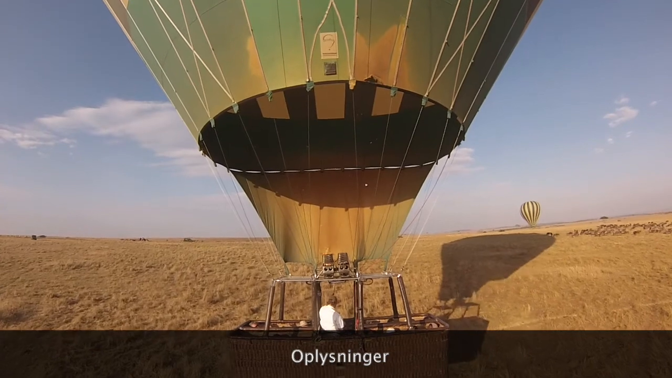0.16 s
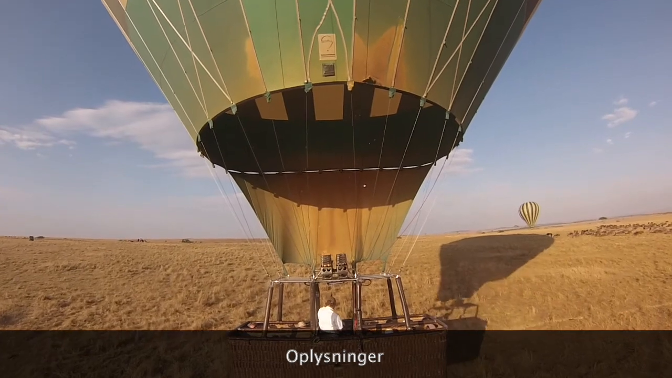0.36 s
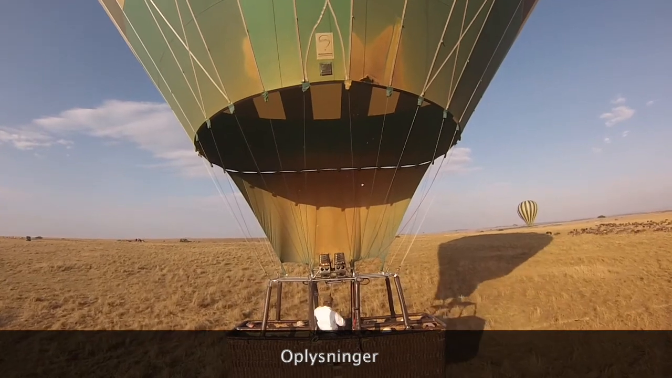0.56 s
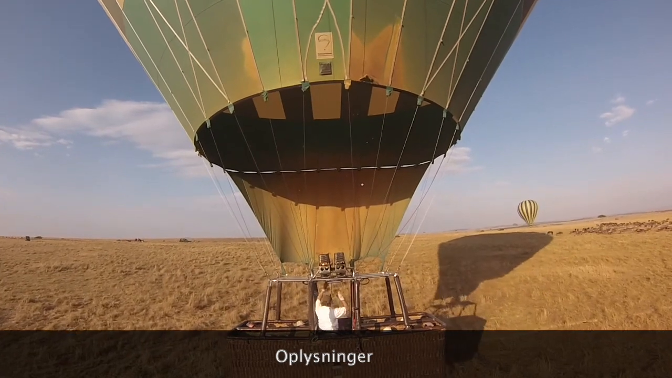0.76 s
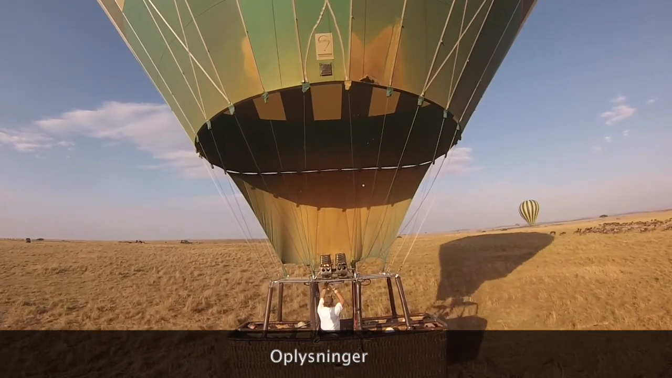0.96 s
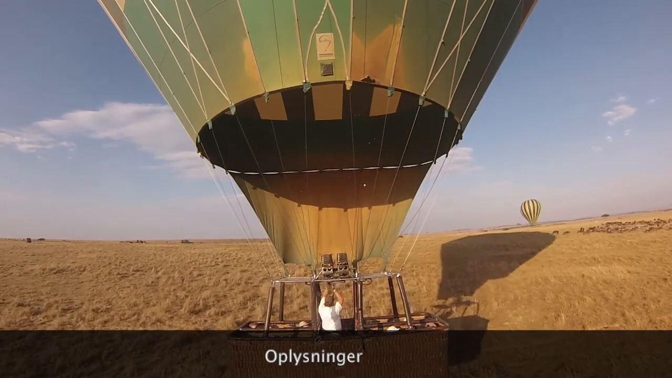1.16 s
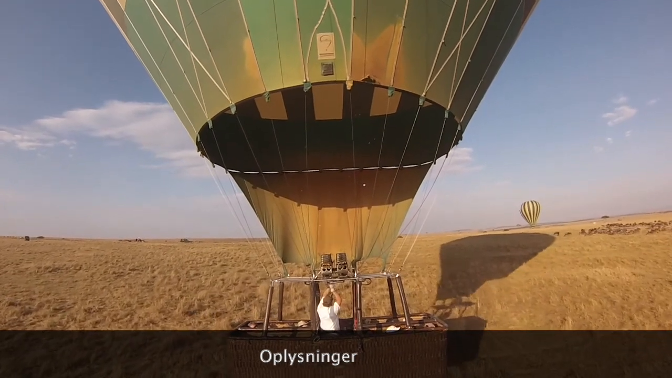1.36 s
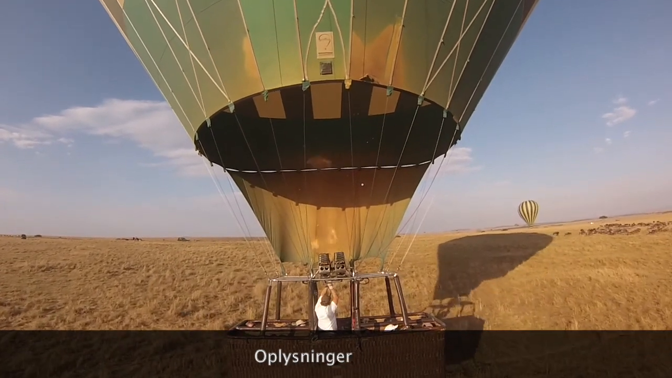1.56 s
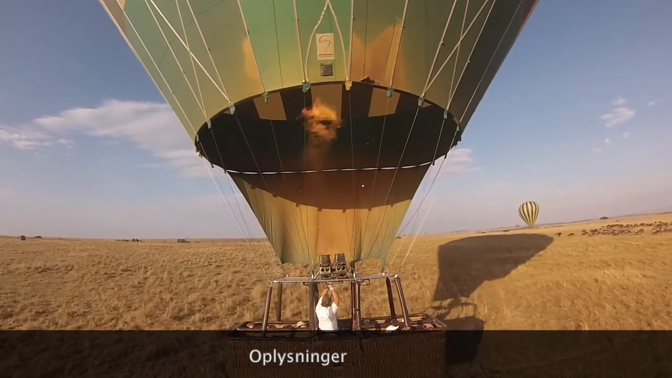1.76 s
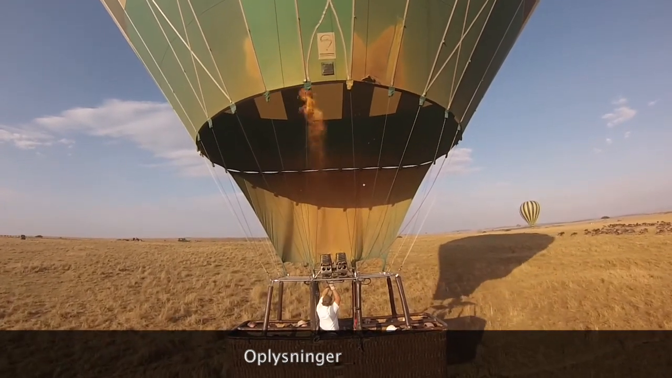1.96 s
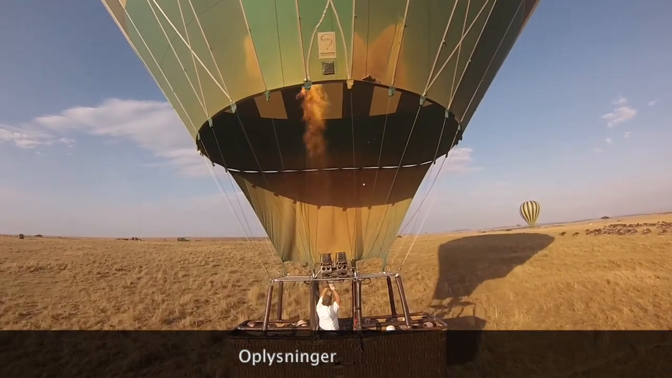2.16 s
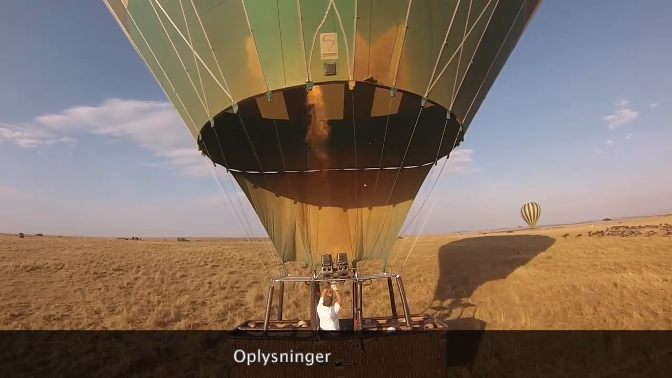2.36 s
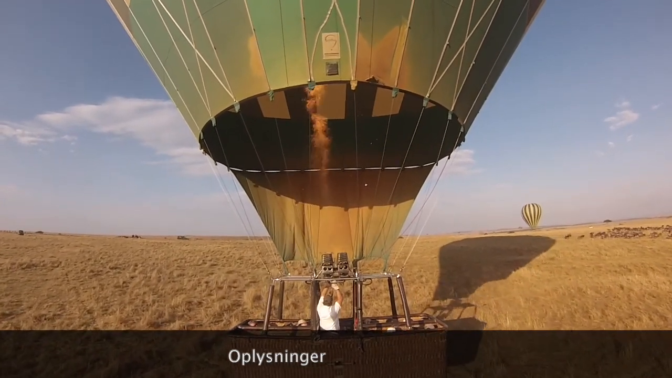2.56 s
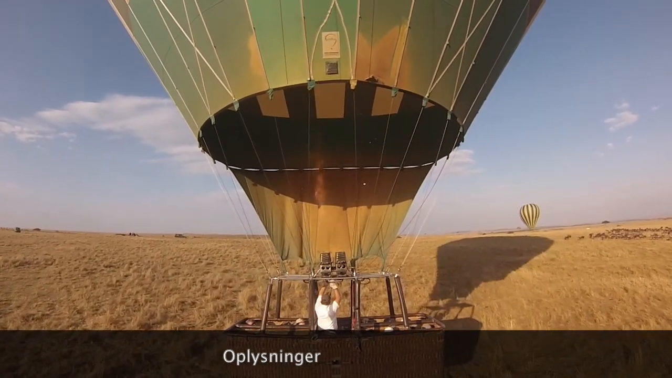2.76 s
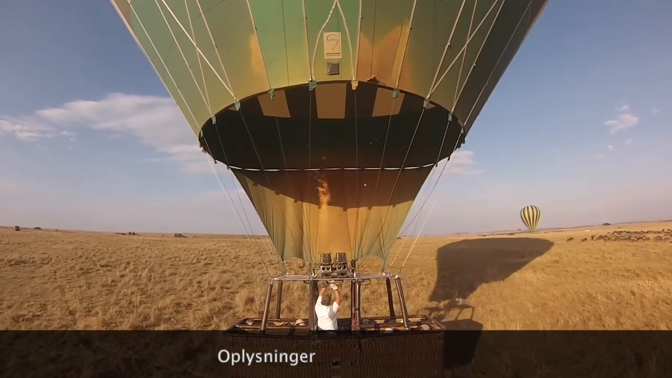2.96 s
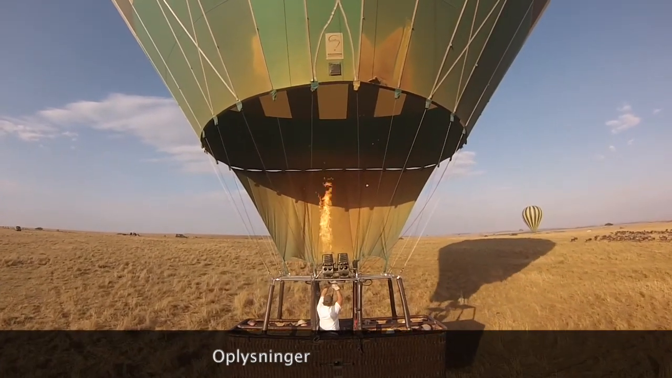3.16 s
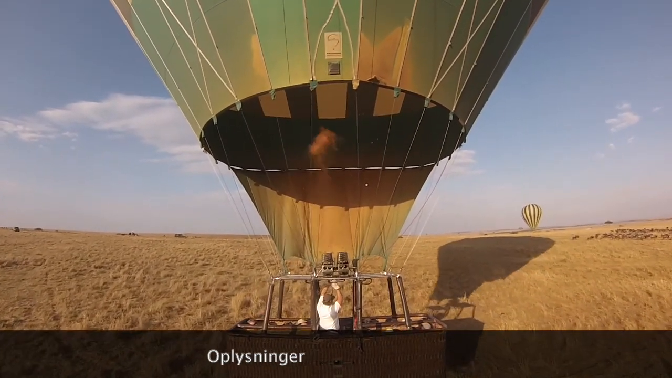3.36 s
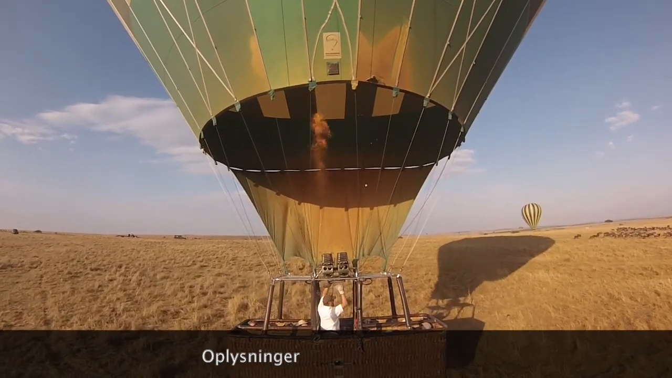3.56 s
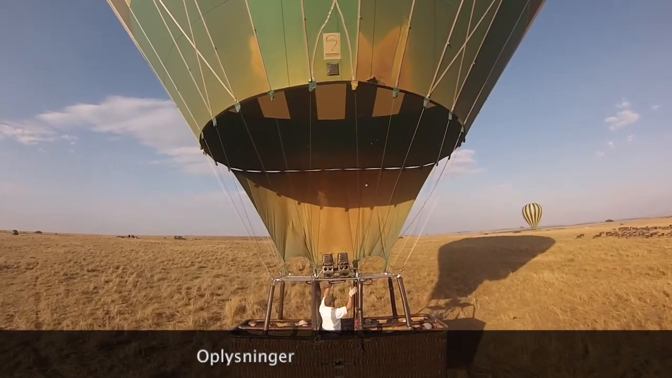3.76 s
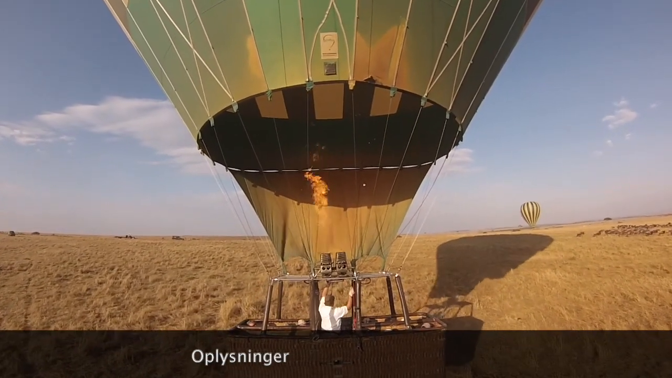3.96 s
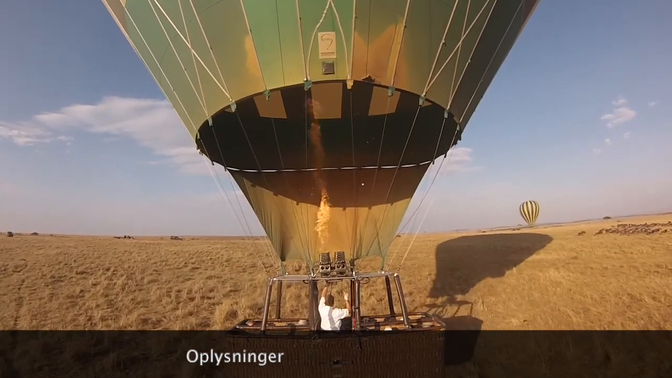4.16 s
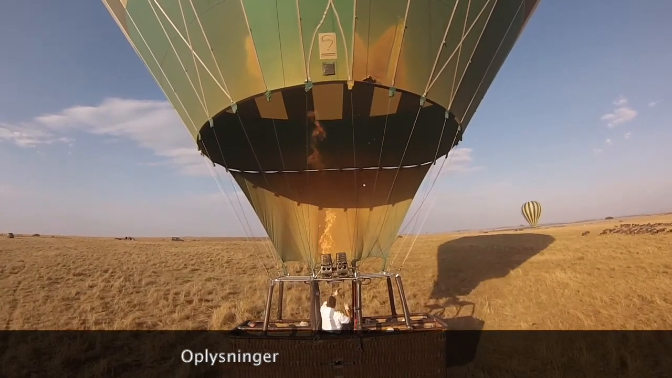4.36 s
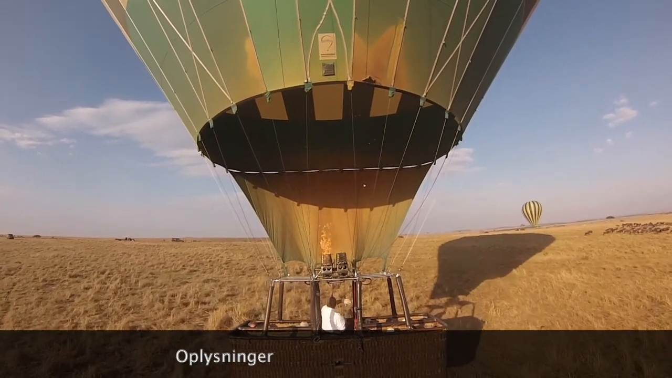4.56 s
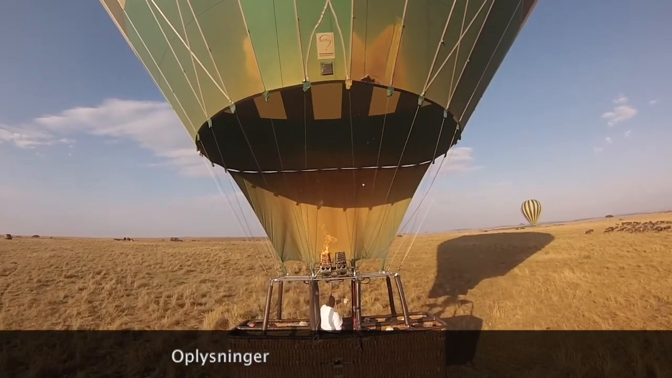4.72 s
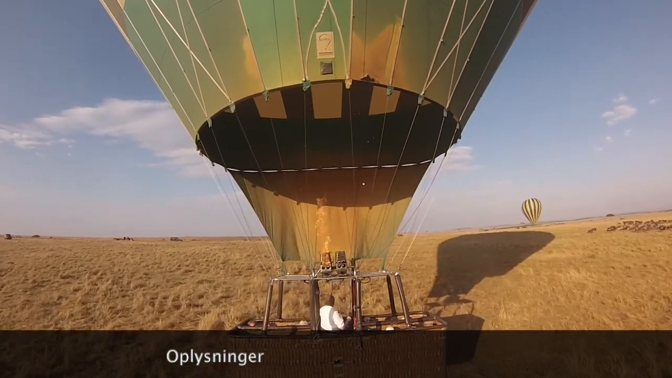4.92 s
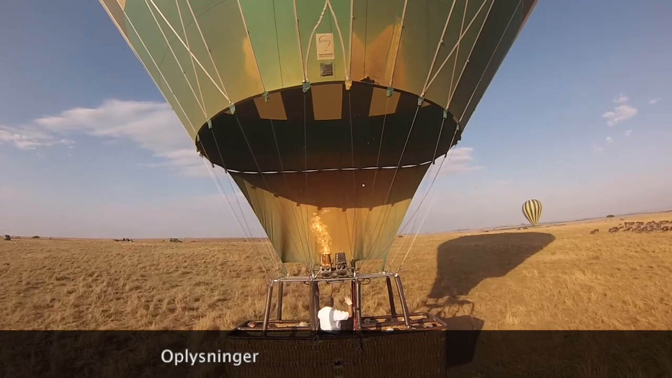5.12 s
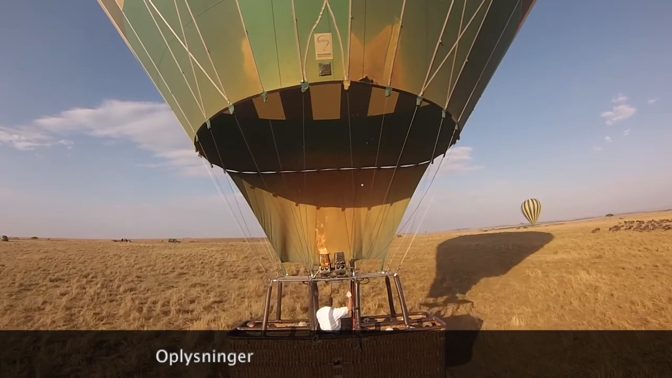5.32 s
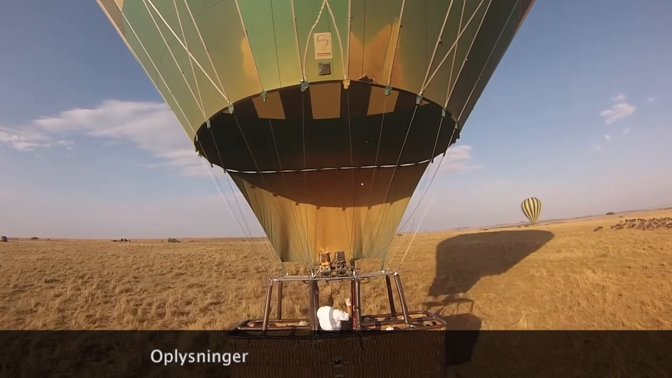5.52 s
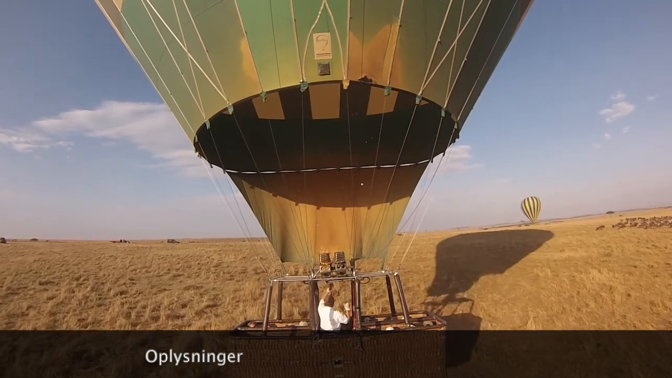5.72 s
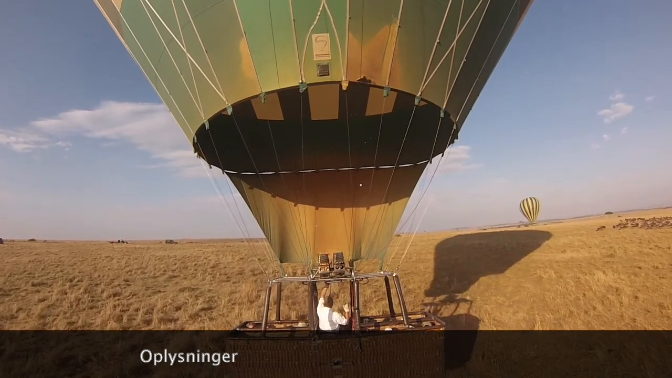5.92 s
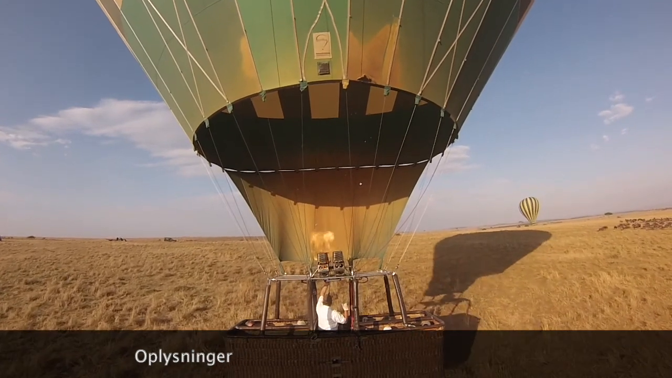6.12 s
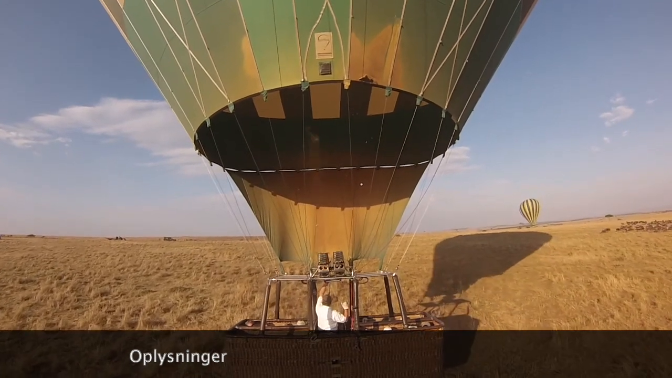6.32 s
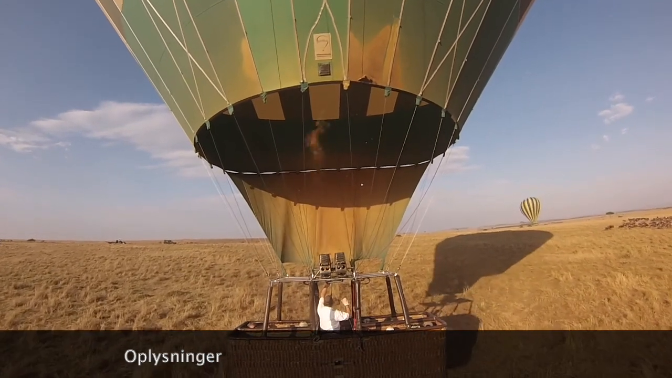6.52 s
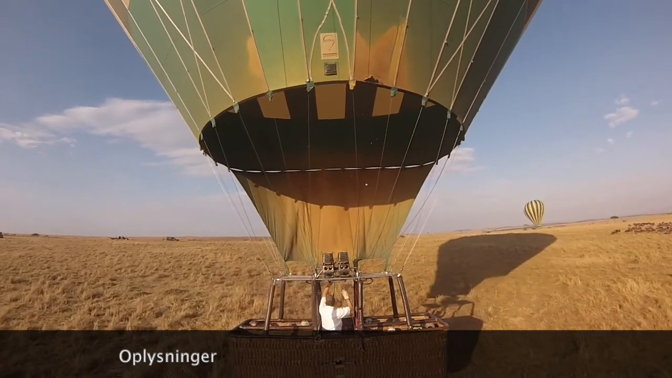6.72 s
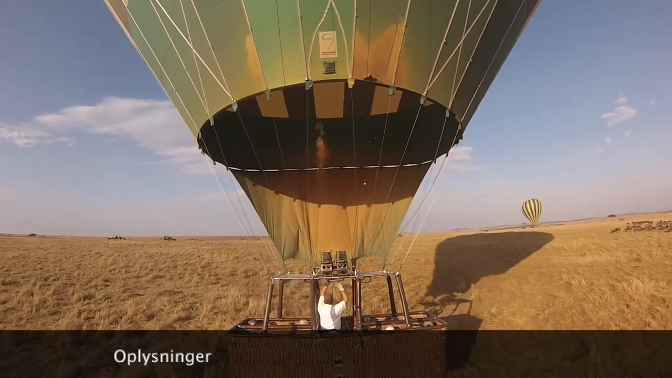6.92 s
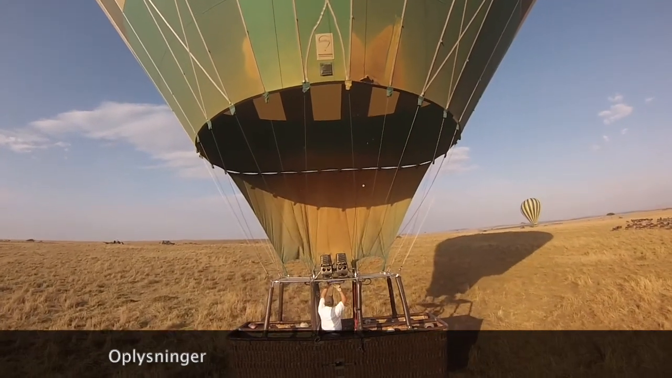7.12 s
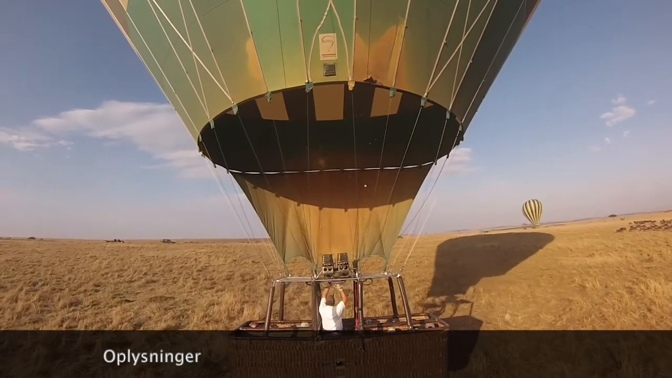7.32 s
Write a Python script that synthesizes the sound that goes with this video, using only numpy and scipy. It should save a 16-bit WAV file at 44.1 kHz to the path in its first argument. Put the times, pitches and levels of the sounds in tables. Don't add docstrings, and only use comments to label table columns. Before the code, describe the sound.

Outdoors, a propane burner bursts into deep, ragged roars topped by gas-jet hiss, separated by short lulls of soft wind and faint hissing.

```python
import sys
import numpy as np
from scipy import signal
from scipy.fft import rfft, irfft, next_fast_len
from scipy.io import wavfile
from scipy.ndimage import uniform_filter1d

SR = 44100
rng = np.random.default_rng(int(sys.argv[2]) if len(sys.argv) > 2 else 0)


def persist_wave(psi):
    counts = np.round(np.clip(psi, -1, 1) * 32767).astype(np.int16)
    wavfile.write(sys.argv[1], SR, np.atleast_2d(counts).T)


def linear_from_db(decibels):
    return 10 ** (np.asarray(decibels, float) / 20)


N = 325369

# pitch_hz, level_db (per Hz)
QUIET_COLOUR = [(41, -34), (92, 0.5), (161, -8.5), (231, -3), (397, -12), (500, -9.5), (700, -15.5),
                (1340, -16.5), (1800, -29.5), (5040, -35), (7500, -35.5), (9500, -35), (12500, -39.5),
                (15400, -46)]
# pitch_hz, level_db (per Hz)
WIND_COLOUR = [(15, -16), (30, -8), (45, 0), (58, -7), (75, -14), (110, -28)]
# time_s, wind_db, air_db
STILL_LEVELS = [
    [(0.0, -51, -48), (0.28, -46, -49), (0.502, -50, -52), (0.702, -50.5, -52), (1.052, -52, -50.5),
     (1.178, -48, -51.5), (1.33, -49, -51)],
    [(5.45, -52, -52), (5.858, -51, -50), (6.04, -51, -52)],
]
# pitch_hz, width_hz, early_db, late_db
PILOT_WHISTLES = [(3470, 240, -67, -76), (4320, 500, -70, -72), (3700, 1600, -71, -69)]
# pitch_hz, level_db (per Hz)
SCUFF_COLOUR = [(800, -12), (1250, 6), (1700, -23), (2600, -7), (3300, -0.5), (4300, -6.5), (4900, -12),
                (6500, -12), (8600, -5), (11000, -22), (15000, -22)]
# start_s, level_db, rise_s, decay_s, strongest_hz
RUSTLE_EVENTS = [
    (0.012, -45.5, .001, .012, 3500),
    (.149, -40.5, 0.0014, 0.017, 4350),
    (.165, -51.5, .01, 0.045, 2900),
    (2.76, -50, .08, 0.34, 2400),
    (3.088, -43, .004, .01, 3000),
]
# open_s, let_go_s, flow_db, sag_db_per_s, dying_db_per_s
VALVE_PULLS = [
    (1.348, 1.704, -2.5, 5, 80),
    (1.49, 2.743, 2.5, 5.5, 94),
    (3.151, 3.747, 1.5, 12.5, 80),
    (3.833, 4.53, -1.55, 7, 80),
    (6.054, 7.06, 1, 6.5, 68),
    (7.112, 7.6, -2, 0.5, 80),
]
OPENING_DB, OPENING_S = 66.5, 0.034
CLOSING_S, DYING_DB = 0.07, 129
# middle_s, length_s, rumble_db, body_db, jets_db
FLAME_SWELLS = [(1.445, 0.038, 0.5, 2.5, 2.5), (1.653, 0.058, 5, 2, 2.5), (1.78, 0.17, -1.5, -0.8, -2.5),
                (1.896, 0.041, 4, -1, 2.5), (2.23, 0.22, -0.5, 1.6, 3), (2.32, 0.021, 0.5, 5, 2.3),
                (2.722, 0.35, 1.5, 2.5, 3.1), (3.08, 0.22, -2.2, 3.5, 0), (3.252, 0.043, -2.5, 3.5, 3.5),
                (3.7, 0.41, 0, 1.1, 1.5), (3.946, 0.031, 4, -2, -0.5), (4.045, .06, 2.8, -3.5, 1),
                (4.206, .2, 1, -2, -0.6), (4.547, 0.066, 4, -1, 0.5), (4.616, 0.14, 3.5, -0.1, -1.5),
                (6.105, .05, -4.5, -1.5, 0.5), (6.18, 0.19, -1, 2.5, 1.5), (6.348, 0.17, -0.7, 6, 0),
                (6.405, 0.05, -2, -2.7, -3.5), (6.57, 0.19, 0.5, 2.5, -3.7), (6.699, 0.082, -0.5, -4, -2),
                (6.768, 0.086, -1.5, 1.3, -3.5), (6.995, 0.068, 2.5, 1.5, -3.5),
                (7.126, 0.18, 3.5, 0, -0.5)]
# time_s, peak, pitch_hz
GAS_POPS = [(1.4615, -.55, 170), (1.784, .65, 130), (1.93, .55, 140), (2.3295, -.75, 100),
            (2.5885, .65, 125), (2.7245, .5, 230), (3.2155, .4, 260), (4.4055, .6, 170), (4.431, .85, 220),
            (6.145, .55, 170), (6.5365, -.65, 200), (6.559, -.95, 240), (6.599, .7, 190)]
# pitch_hz, level_db (per Hz)
RUMBLE_COLOUR = [(12, -38), (20, -14), (75, 1.5), (114, -2.5), (168, -0.5), (217, -5), (248, -3.5),
                 (338, -10.5), (500, -13.5), (650, -19.5), (1100, -120)]
# pitch_hz, level_db (per Hz)
BODY_COLOUR = [(250, -2), (350, 3.5), (500, -3.5), (700, -5.5), (1000, -9.5), (1500, -16), (2200, -26),
               (3000, -56.5)]
# pitch_hz, level_db (per Hz)
JET_COLOUR = [(1500, -55), (1900, -5.5), (3200, 2), (4500, -0.5), (5150, -5.5), (5600, -33)]
# pitch_hz, level_db (per Hz)
SIZZLE_COLOUR = [(4700, -33), (5150, -3.5), (5600, -6), (7000, -9), (9000, -2), (12000, -9), (12800, -17),
                 (14200, -16), (15400, -22)]
# level_db, knee_db, share_above, share_below
RUMBLE_LAW, BODY_LAW = (-15.5, -8.5, 0.07, 0.63), (-22.5, -16.5, 0.21, .85)
JET_LAW, SIZZLE_LAW = (-32.5, -19.5, 0.94, 1.15), (-29.5, -9, 0.97, 1)
STARVED_DB, STARVED_SHARE = -35, 0.65
DEEPENING = 0.38
DULLING = 0.24
# pitch_hz, width_hz, level_db
HOUSING_MODES = [(1380, 500, 6), (1980, 550, -12), (2450, 350, -13), (4250, 900, 8), (6950, 500, 5),
                 (10500, 1200, -3), (11900, 600, 4), (14200, 1500, 4), (6300, 700, -3), (3700, 400, -2),
                 (5150, 800, -13), (7520, 700, -15)]
# start_s, depth_db
GAIN_DIPS = [
    (2.33, 4.5),
    (2.587, 5),
    (4.421, 3),
    (6.56, 2),
    (6.6, 5),
]
DIP_S, RECOVERY_DB_PER_S = 0.014, 29
# middle_s, length_s, depth_db
TREBLE_LOSSES = [
    (1.589, .014, -24),
    (1.984, .045, -30),
    (2.934, .018, -15),
    (6.326, .022, -13),
]
# middle_s, length_s, pitch_hz, level_db
THIN_TONES = [(1.988, .04, 3924, -34), (1.984, .045, 4446, -33), (1.988, .04, 8026, -37),
              (1.988, .04, 8311, -36), (1.98, .04, 8451, -38), (1.978, .035, 8941, -38),
              (2.934, .035, 8634, -52), (1.995, .04, 1582, -34), (1.998, .035, 720, -26),
              (1.978, .04, 831, -32), (1.975, .04, 946, -33), (6.322, .03, 745, -23),
              (6.326, .035, 1040, -24), (6.32, .03, 1450, -28), (6.327, .035, 3929, -35),
              (6.325, .04, 5566, -38)]


def rms_one(x):
    return x / np.sqrt(np.mean(x ** 2) + 1e-20)


def drift(rate_hz):
    step = 20
    r = np.exp(-2 * np.pi * rate_hz * step / SR)
    noise = rng.standard_normal(N // step + 3002)
    slow = signal.lfilter([1], [1, -2 * r, r * r], noise)[3000:]
    return np.interp(np.arange(N) / step, np.arange(len(slow)), rms_one(slow))


def resonance(x, hz, width_hz):
    r = np.exp(-np.pi * width_hz / SR)
    gain = (1 - r * r) / 2
    return signal.lfilter(gain * np.array([1, 0, -1]), [1, -2 * r * np.cos(2 * np.pi * hz / SR), r * r], x)


def housing(x):
    for hz, width_hz, db in HOUSING_MODES + HOUSING_MODES:
        x = x + (linear_from_db(db / 2) - 1) * resonance(x, hz, width_hz)
    return x


def turbulence(colour, shared, shared_db, own_db, own_rate):
    hz_points, db_points = np.transpose(colour)
    size = next_fast_len(N)
    white = rfft(rng.standard_normal(N), size)
    hz = np.linspace(1, SR / 2, len(white))
    shaped = white * linear_from_db(np.interp(np.log(hz), np.log(hz_points), db_points, left=-90, right=-90))
    out, octave = np.zeros(N), np.log2(hz)
    for centre in np.arange(np.log2(hz_points[0]), np.log2(hz_points[-1]) + .5, .5):
        window = np.cos(np.pi * np.clip(octave - centre, -.5, .5)) ** 2
        band = irfft(shaped * window, size)[:N]
        out += band * linear_from_db(shared_db * shared + own_db * drift(own_rate))
    return out


def wind_and_air(t):
    s, wind_db, air_db = np.transpose(np.concatenate(STILL_LEVELS))
    wind = rms_one(turbulence(WIND_COLOUR, 0, 0, own_db=0, own_rate=6))
    wind /= np.sqrt(uniform_filter1d(wind ** 2, size=4000) + .2)
    air = rms_one(turbulence(QUIET_COLOUR, 0, 0, own_db=.5, own_rate=12))
    return linear_from_db(np.interp(t, s, wind_db)) * wind + linear_from_db(np.interp(t, s, air_db)) * air


def pilot_light(t):
    out = np.zeros(N)
    for hz, width_hz, early_db, late_db in PILOT_WHISTLES:
        breath = rng.standard_normal(N) * linear_from_db(drift(12))
        whistle = resonance(resonance(breath, hz, width_hz), hz, width_hz)
        out += linear_from_db(np.interp(t, [0, N / SR], [early_db, late_db])) * rms_one(whistle)
    return out


def stillness():
    t = np.arange(N) / SR
    return wind_and_air(t) + pilot_light(t)


def rustles():
    t, out = np.arange(N) / SR, np.zeros(N)
    scuff = rms_one(housing(turbulence(SCUFF_COLOUR, 0, 0, own_db=1.5, own_rate=40)))
    for s, db, rise, decay, hz in RUSTLE_EVENTS:
        age = np.maximum(t - s, 0)
        shape = (1 - np.exp(-age / rise)) * np.exp(-age / decay)
        out += linear_from_db(db) * shape * (scuff + 0.91 * resonance(scuff, hz, width_hz=300))
    return out


def gas_flow():
    t, flow = np.arange(N) / SR, np.full(N, -150.)
    for opens, let_go, db, sag, dying in VALVE_PULLS:
        age = np.maximum(t - opens, 0)
        opening = OPENING_DB * np.exp(-age / OPENING_S)
        sagging = sag * np.minimum(age, let_go - opens)
        fall = dying * CLOSING_S * np.logaddexp(0, (t - let_go) / CLOSING_S)
        pull = db - opening - sagging - fall / (1 + fall / DYING_DB)
        flow = np.where(t >= opens, np.maximum(flow, pull), flow)
    return flow


def follows(flow, law):
    db, knee_db, above, below = law
    return linear_from_db(db + above * np.maximum(flow, knee_db) + below * np.minimum(flow - knee_db, 0))


def flares():
    t, swell = np.arange(0, N, 20) / SR, 0
    for s, length, *db in FLAME_SWELLS:
        swell = swell + np.outer(db, np.exp(-(2 * (t - s) / length) ** 2))
    return [linear_from_db(np.interp(np.arange(N) / SR, t, row)) for row in swell]


def pops(roar):
    out = roar.copy()
    for s, peak, hz in GAS_POPS:
        turn = np.arange(-1, 1.5, hz / SR)
        swing = np.cos(2 * np.pi * turn) * np.exp(-np.abs(turn) / np.where(turn < 0, .4, .6))
        start = round((s - 1 / hz) * SR)
        span = slice(start, start + len(turn))
        out[span] += peak * swing - .7 * np.exp(-(turn / .4) ** 2) * roar[span]
    return out


def flame_rumble(flow, alight, flare, flutter):
    noise = turbulence(RUMBLE_COLOUR, flutter, shared_db=-2.0, own_db=-0.73, own_rate=3.8)
    return pops(alight * flare * follows(flow, RUMBLE_LAW) * rms_one(noise))


def flame_body(flow, alight, flare, jet_gain, flutter):
    noise = turbulence(BODY_COLOUR, flutter, shared_db=0.44, own_db=1.26, own_rate=22)
    mid = rms_one(housing(noise))
    upper = signal.sosfiltfilt(signal.butter(2, 850, "high", fs=SR, output="sos"), mid)
    follow = follows(flow, BODY_LAW)
    drive = (jet_gain / follow / linear_from_db(-11.5)) ** 0.5
    return alight * flare * follow * (mid + (drive - 1) * upper)


def gas_jets(flow, jet_gain, gas):
    noise = turbulence(JET_COLOUR, gas, shared_db=0.07, own_db=1.36, own_rate=23)
    high = jet_gain * rms_one(housing(noise))
    edge = signal.sosfiltfilt(signal.butter(2, 3100, "low", fs=SR, output="sos"), high)
    return high + (linear_from_db(-DEEPENING * (np.maximum(flow, -40) - 1.0)) - 1) * edge


def gas_sizzle(flow, flare, gas):
    noise = turbulence(SIZZLE_COLOUR, gas, shared_db=0.85, own_db=0.9, own_rate=11)
    top = flare * follows(flow, SIZZLE_LAW) * rms_one(housing(noise))
    airy = signal.sosfiltfilt(signal.butter(2, 10000, "high", fs=SR, output="sos"), top)
    return top + (linear_from_db(DULLING * (flow + 3.0)) - 1) * airy


def burner():
    flow = gas_flow()
    low_flare, mid_flare, jet_flare = flares()
    alight = linear_from_db(STARVED_SHARE * np.minimum(flow - STARVED_DB, 0))
    jet_gain = jet_flare * follows(flow, JET_LAW)
    flutter = rms_one(drift(3.9) + drift(40))
    gas = drift(29)
    roar = flame_rumble(flow, alight, low_flare, flutter)
    roar += flame_body(flow, alight, mid_flare, jet_gain, flutter)
    return roar + gas_jets(flow, jet_gain, gas) + gas_sizzle(flow, jet_flare, gas)


def scene():
    return (stillness() + rustles() + burner())[None]


def gain_control(x):
    t, dip_db = np.arange(N) / SR, np.zeros(N)
    for s, depth_db in GAIN_DIPS:
        falling = depth_db * (t - s) / DIP_S
        climbing = depth_db - RECOVERY_DB_PER_S * (t - s)
        dip_db += np.clip(np.minimum(falling, climbing), 0, None)
    return x * linear_from_db(-dip_db)


def treble_losses(x):
    treble = signal.sosfiltfilt(signal.butter(6, 1750, "high", fs=SR, output="sos"), x)
    t, out = np.arange(N) / SR, x.copy()
    for s, length, depth_db in TREBLE_LOSSES:
        fade = np.clip(1.6 - 3.2 * np.abs(t - s) / length, 0, 1)
        out -= (1 - linear_from_db(depth_db)) * np.sin(np.pi / 2 * fade) * treble
    for s, length, hz, db in THIN_TONES:
        window = np.cos(np.pi * np.clip((t - s) / length, -.5, .5))
        out += linear_from_db(db) * window * np.sin(2 * np.pi * (hz * t + rng.random()))
    return out


def band_limit(x):
    return signal.sosfilt(signal.butter(12, 15910, fs=SR, output="sos"), x)


def record(dry):
    x = treble_losses(gain_control(dry[0]))
    x = 2.5 * np.tanh(x / 2.5)
    x = signal.sosfilt(signal.ellip(12, .3, 70, 15270, fs=SR, output="sos"), x)
    return band_limit(x[None])


dry = scene()
out = record(dry)
persist_wave(out)
```